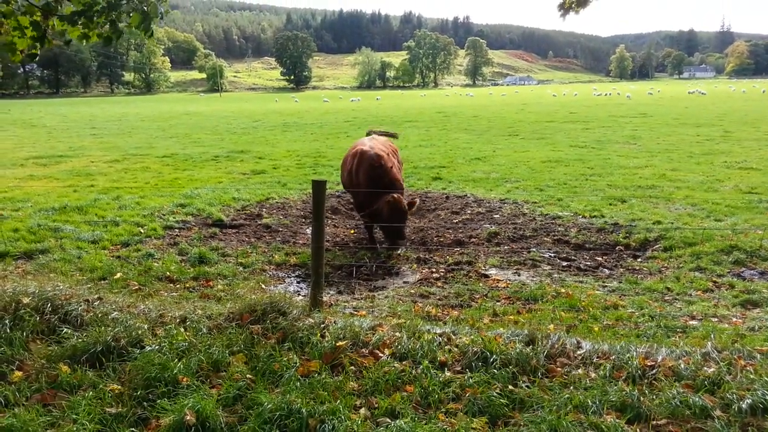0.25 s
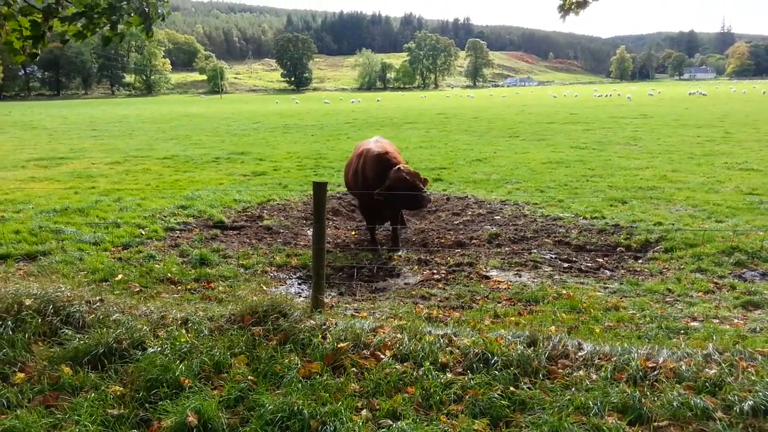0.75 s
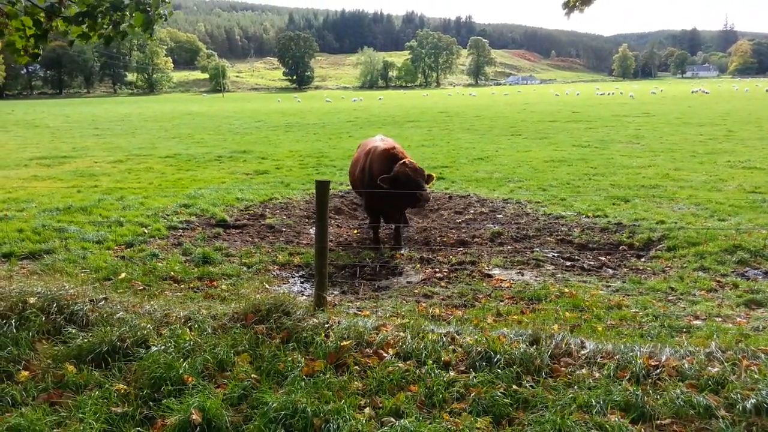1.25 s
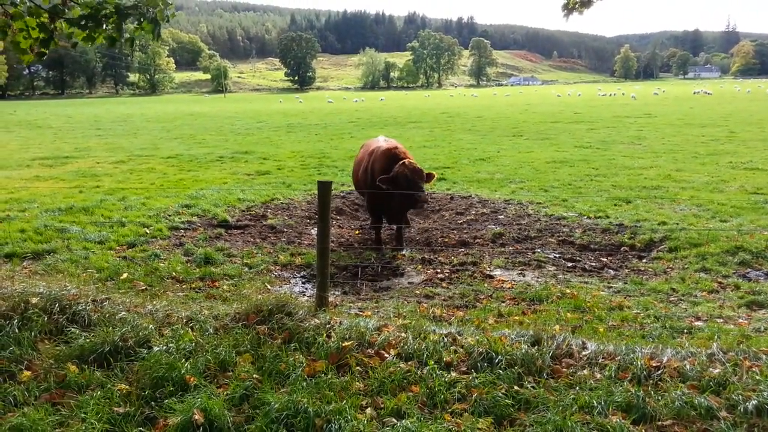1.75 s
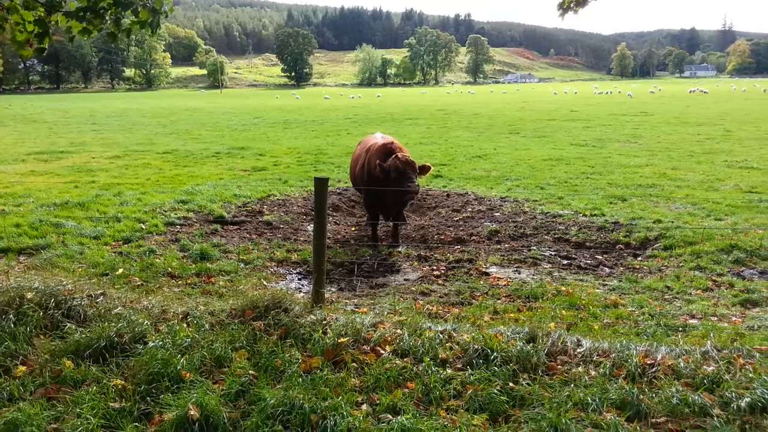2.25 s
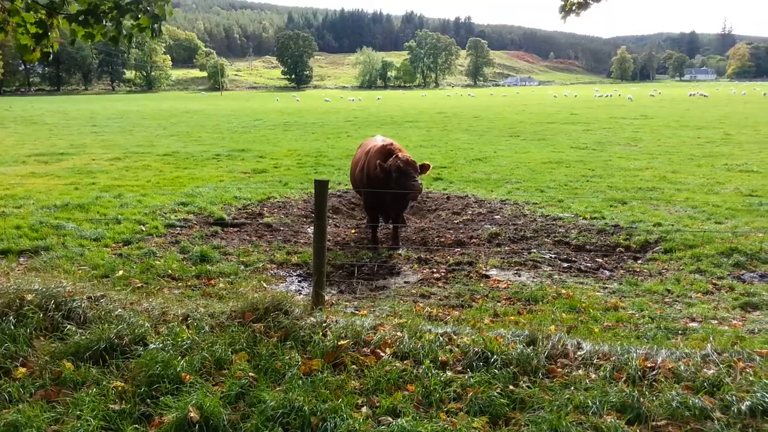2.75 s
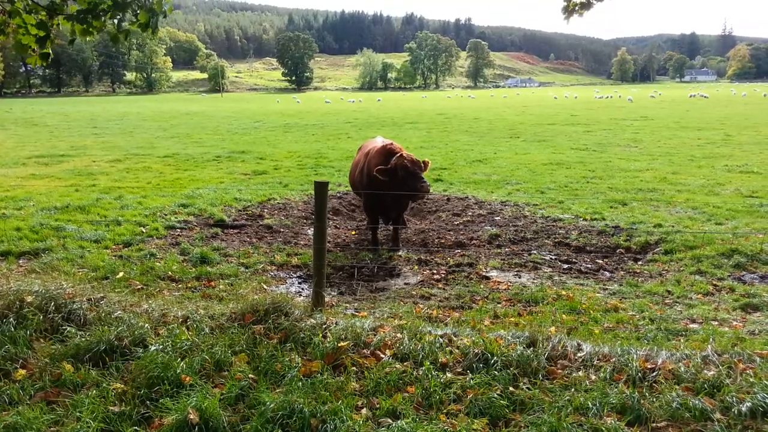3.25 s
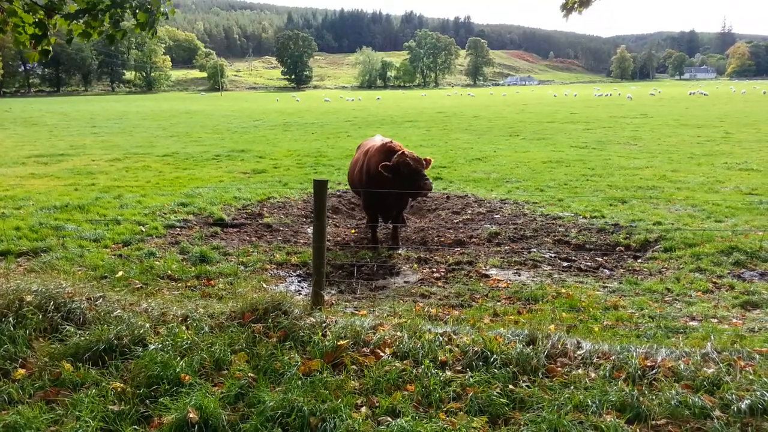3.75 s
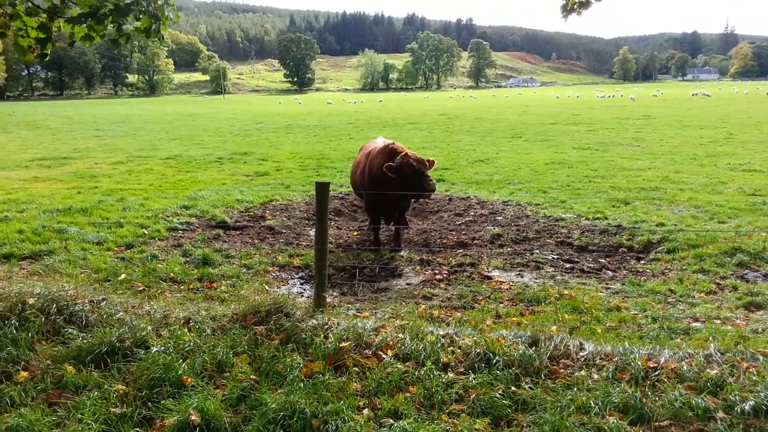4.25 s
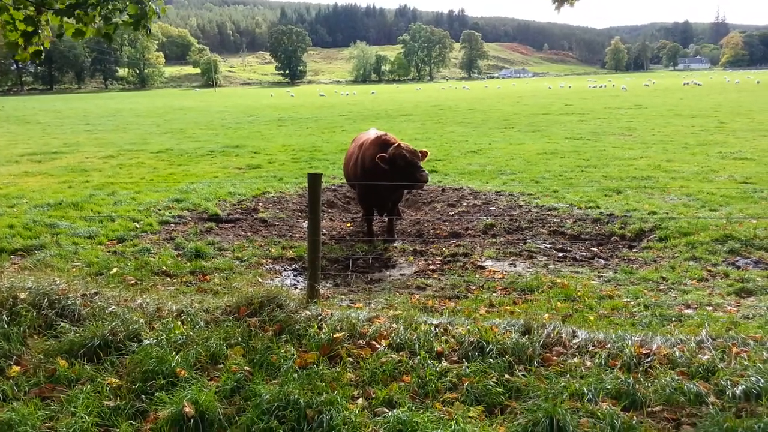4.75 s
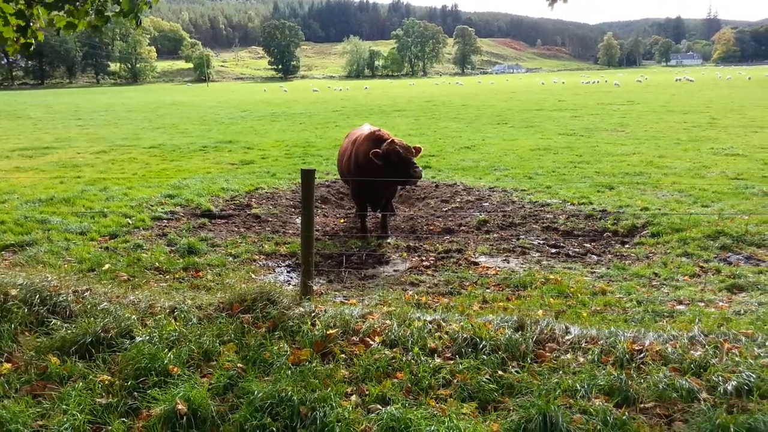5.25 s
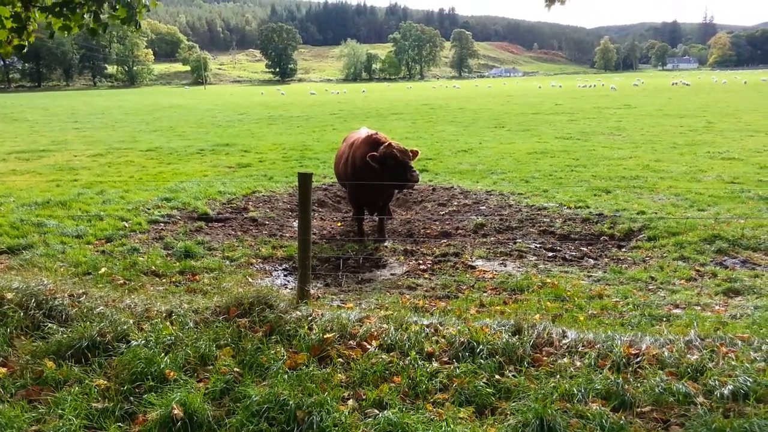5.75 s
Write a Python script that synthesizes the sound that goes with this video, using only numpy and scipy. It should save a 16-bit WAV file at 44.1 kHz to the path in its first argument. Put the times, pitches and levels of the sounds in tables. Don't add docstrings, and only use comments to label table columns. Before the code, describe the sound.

A bull ends a soft low, then gives two long, rumbling, hoarse bellows in an open pasture while gusty wind buffets the microphone.

```python
import sys
import numpy as np
from scipy import signal
from scipy.fft import rfft, irfft
from scipy.io import wavfile
from scipy.ndimage import uniform_filter1d

SR = 44100
rng = np.random.default_rng(int(sys.argv[2]) if len(sys.argv) > 2 else 0)


def gain_from_decibels(decibels):
    exponent = np.asarray(decibels, float) / 20
    return 10 ** exponent


def to_wav(s):
    ch = np.atleast_2d(s).T
    pcm = np.round(np.clip(ch, -1, 1) * 32767)
    wavfile.write(sys.argv[1], SR, pcm.astype(np.int16))


N = 265345

# frequency in Hz, width in Hz, level in dB.
NARROW_THROAT = [(475, 21.5, 1.5), (733, 64, 8.5), (854, 114, -4), (1020, 70, 5), (1185, 110, -16),
                 (1627, 150, -12.5), (1865, 120, -5.5), (1840, 170, -5)]
# frequency in Hz, width in Hz, level in dB.
WIDE_THROAT = [(516.5, 18, 1), (665, 51, 2), (774, 30, -2), (860, 20, -3), (958.5, 55, 0), (1163, 52, -5),
               (1475, 27, -8), (1723, 118, -11.5), (2073, 195, -20), (2440, 130, -29.5), (2893, 65, -22)]
# frequency in Hz, width in Hz, level in dB.
PUFF_THROAT = [(616, 122, -3), (740, 255, -2), (966, 166, -6.5), (1116, 100, -14), (1700, 270, -11.5),
               (1880, 130, -13.5), (2210, 420, -16.5)]
# order of the fold cycle, level in dB, below which order (3 or 4).
SIDE_ORDERS = [(2, -18, 3), (5, -14, 3), (6, -27, 3), (8, -35, 3), (9, -34, 3), (10, -23.5, 4),
               (11, -28, 3)]


def bellows():
    hz, fourth_db, pairing_db, throat_db, rough, mouth = bellow_controls()
    third_db = fourth_db + pairing_db
    cycle = np.cumsum(hz) / SR
    chest = chest_orders(cycle, third_db, fourth_db, rough, mouth)

    slip = .3 * rough ** 2.5 * drift(9)
    beats = 2 * (cycle + slip) + .12 * rough ** 2 * drift(60)
    count = np.floor(np.maximum.accumulate(beats))
    closing = np.diff(count, prepend=count[0]) > 0
    paired = np.clip((third_db - fourth_db + 14) / 22, 0, 1)
    weak = np.where(count % 2 == 1, 1 - .8 * paired, 1)
    pulses = rms_one(closing * weak * gain_from_decibels(6 * rough ** 1.5 * rng.standard_normal(N)))

    gate = .35 + np.exp(-3 * (beats % 1)) * weak
    breath = rms_one(gate * gain_from_decibels(1.9 * drift(37)) * rng.standard_normal(N))
    airy = np.clip(.2 + .8 * rough ** 1.6, 0, 1)
    source = np.sqrt(1 - airy ** 2) * pulses + airy * breath
    voiced_rush = .8 + 2.6 * (1 - airy) * (1 - paired) ** 2
    rush = np.where(mouth > 1, 1.9 - 1.1 * mouth, voiced_rush)
    source = source + rush * band(breath, 1350, 6000)

    throat = 0
    for shape, modes in enumerate((NARROW_THROAT, WIDE_THROAT, PUFF_THROAT)):
        share = np.clip(1 - np.abs(mouth - shape), 0, 1)
        throat = throat + np.sqrt(share) * rms_one(resonances(source, modes))
    return chest + gain_from_decibels(throat_db) * evened(throat)


def chest_orders(cycle, third_db, fourth_db, rough, mouth):
    seventh_db = fourth_db - 38.5 + 27 * np.sqrt(np.clip(mouth * (1 - rough), 0, 1))
    levels = {3: third_db, 4: fourth_db}
    orders = [(3, third_db), (4, fourth_db), (7, seventh_db)]
    orders += [(k, levels[of] + db) for k, db, of in SIDE_ORDERS]
    chest = 0
    for k, db in orders:
        unsteady = rough ** 1.5 * (.3 if k == 4 else .95)
        chance = (drift(16) + 1j * drift(16)) / np.sqrt(2)
        wander = np.sqrt(1 - unsteady ** 2) + unsteady * chance
        db = db - 14 * rough * (k > 8)
        turning = np.exp(2j * np.pi * (k * cycle + .03 * k * k))
        chest = chest + gain_from_decibels(db) * np.sqrt(2) * np.real(wander * turning)
    return chest


# time in seconds, slow fold cycle in Hz, effort in dB, pairing of beats in dB.
VOICE = [
    [(1.26, 49, -30, -4), (1.34, 55.44, -19, -10), (1.5, 54.35, -20, 0), (1.7, 55.43, -18, -8),
     (1.9, 53.86, -22.5, 3), (2.15, 54.4, -21.5, 5), (2.45, 55.2, -22.5, 5.5), (2.74, 53.35, -22.5, 2.5),
     (2.853, 51.02, -16.5, -18)],
    [(3.795, 47.63, -23.5, -39), (3.84, 53.27, -18.5, -45), (3.92, 54.68, -19, -6),
     (4.12, 55.87, -19, -13.5), (4.3, 55.5, -20, -2.5), (4.6, 53.57, -21.5, 0.5), (5.0, 56.37, -20.5, 3),
     (5.495, 52.31, -23.5, 5.5), (5.54, 51.4, -14, -8)],
]
# time in seconds, roughness 0 to 1, mouth from 0 narrow to 1 wide.
BEATING = [
    [(1.33, .15, 0), (1.37, .75, 0), (1.75, .65, .1), (1.9, .45, .3), (2.1, .3, .45), (2.65, .32, .6),
     (2.75, .6, .8), (2.86, .8, 1)],
    [(3.88, .12, 0), (3.92, .5, 0), (4.25, .5, .1), (4.4, .8, .3), (4.72, .7, .6), (4.8, .15, .9),
     (5.0, .11, 1), (5.3, .25, 1), (5.54, .6, 1)],
]
# start in seconds, hold in seconds, level in dB.
EXHALES = [
    (2.922, 0.048, -28),
    (5.576, 0.033, -28),
]


def bellow_controls():
    onset_db_per_s, stop_db_per_s = 900, 497
    throat_rise_s, throat_rise_db = 0.082, 13
    throat_fade_s, throat_fade_db = .06, 3.5
    puff_rise_db_per_s, puff_fall_db_per_s = 175, 252
    flick_hz, flick_s = 6, .035
    t = np.arange(N) / SR
    hz, effort_db, pairing_db = in_time(list(VOICE[0]) + list(VOICE[1]))
    silence_db, throat_db, shape = np.full(N, -90.), np.full(N, -90.), []
    for rows, beats, (puff_s, hold_s, puff_db) in zip(VOICE, BEATING, EXHALES):
        start, end = rows[0][0], rows[-1][0]
        edge_db = -onset_db_per_s * np.maximum(start - t, 0) - stop_db_per_s * np.maximum(t - end, 0)
        fill_db = -throat_rise_db * np.clip(1 - (t - start) / throat_rise_s, 0, 1)
        fill_db = fill_db - throat_fade_db * np.clip(1 - (end - t) / throat_fade_s, 0, 1)
        exhale_db = puff_db - puff_rise_db_per_s * np.maximum(puff_s - t, 0)
        exhale_db = exhale_db - puff_fall_db_per_s * np.maximum(t - puff_s - hold_s, 0)
        hz = hz + flick_hz * np.clip((t - end) / flick_s, 0, 1) * (t < end + .3)
        silence_db = np.maximum(silence_db, edge_db)
        throat_db = np.maximum(throat_db, np.maximum(-33.5 + edge_db + fill_db, exhale_db))
        shape += [(start - .1, .1, 0)] + list(beats)
        shape += [(beats[-1][0] + .035, 1, 2), (end + .3, 1, 2)]
    rough, mouth = in_time(shape)
    open_share = np.clip(1 - np.abs(mouth - 1), 0, 1)
    return hz, effort_db + silence_db, pairing_db, throat_db + 1.5 * open_share, rough, mouth


# time in seconds, pitch in Hz, level in dB.
LOW = [(0, 106.9, 2), (.08, 105.7, -1), (.14, 105, -0.5), (.2, 103.5, -5), (.26, 96.7, -4), (.3, 91.3, -5),
       (.33, 91, -40)]
# order, level in dB.
LOW_ORDERS = [(1, -32), (2, -28.5), (3, -47), (4, -45.5), (5, -50), (6, -45), (7, -43.5), (9, -51.5),
              (13, -56), (14, -67), (16, -67), (19, -56)]
# centre in seconds, half length in seconds, level in dB.
LOW_PUFF = (0.364, 0.063, -45)


def soft_low():
    hz, db = in_time(list(LOW) + [(.36, 90, -90)])
    cycle = np.cumsum(hz * (1 + 0.0066 * drift(40))) / SR
    tone = 0
    for k, level in LOW_ORDERS:
        order_db = level + db * (1.5 + 0.12 * k) + 3.3 * drift(42)
        tone = tone + gain_from_decibels(order_db) * np.sqrt(2) * np.sin(2 * np.pi * k * cycle + k * k)
    at, half, puff_db = LOW_PUFF
    swell = np.exp(-((np.arange(N) / SR - at) / half) ** 2)
    return tone + gain_from_decibels(puff_db) * swell * rms_one(resonances(rng.standard_normal(N), PUFF_THROAT[:3]))


# start in seconds, end in seconds, frequency in Hz, level in dB.
NOSTRILS = [
    (1.276, 1.5, 1944, -45),
    (2.052, 2.85, 5470, -53),
    (3.783, 4.301, 1895, -49),
    (4.354, 5.549, 2487, -49.5),
]


def nostrils():
    t, out = np.arange(N) / SR, 0
    for start, end, hz, db in NOSTRILS:
        swell = np.clip(np.minimum(t - start, end - t) / 0.082, 0, 1)
        out = out + gain_from_decibels(db) * swell * rms_one(resonances(rng.standard_normal(N), [(hz, 45, 0)]))
    return out


def ground_echo(x):
    return gain_from_decibels(-12) * band(np.roll(x, 310), 122, 3300, order=1)


def right_port(x):
    pole = np.exp(-2 * np.pi * 420 / SR)
    shaded = .5 * x + 0.92 * signal.lfilter([1 - pole], [1, -pole], x)
    return np.interp(np.arange(N) - 2.5, np.arange(N), shaded)


# time in seconds, peak in dB, treble share in dB, length in ms.
RIGHT_EDDIES = [(0.223, -15, -12, 10.4), (0.239, -14, -24, 8.1), (0.352, -14.5, -10, 3.55),
                (0.373, -10.5, -15, 7.7), (0.421, -10.5, -18, 1.6), (0.459, -14.5, -24, 3.3),
                (0.518, -15, -13, 2.8), (0.609, -13, -7.5, 12.7), (0.749, -18, -13.5, 8.2),
                (0.792, -15, -12, 5.6), (0.872, -13, -13, 4.6), (0.889, -10, -7, 3.1),
                (1.169, -18, -9, 4.9), (1.192, -14.5, -16.5, 23), (1.285, -11, -14.5, 37),
                (1.432, -13.5, -25, 4.3), (1.616, -14, -16, 9.1), (1.7, -9.5, -13.5, 3.15),
                (1.931, -9, -10.5, 12.9), (2.115, -11.5, -16.5, 8), (2.19, -18, -15, 9.1),
                (2.332, -17, -13, 5.7), (2.676, -16, -17, 7.1), (2.787, -15, -25, 4.8),
                (2.809, -8, -18.5, 5.2), (2.984, -18.5, -9, 6.04), (3.147, -20.5, -19, 7.3),
                (3.275, -19.5, -15, 20), (3.385, -15, -10, 4.1), (3.494, -13.5, -15, 6.2)]
# time in seconds, peak in dB,
# treble share in dB, length in ms.
MORE_RIGHT_EDDIES = [(3.245, -19.5, -12.5, 4.2), (3.297, -18.5, -15.5, 5), (3.355, -19, -24.5, 5.7),
                     (3.41, -20, -11, 8), (3.465, -23, -11, 15), (3.51, -17, -12.5, 5), (3.535, -20, -10.5, 25),
                     (3.575, -20.5, -18.5, 33), (3.665, -26.5, -24, 5.9), (4.4, -23, -16, 23),
                     (4.541, -16, -9, 12.7), (5.029, -14.5, -10, 6.4), (5.154, -18, -10, 5.5),
                     (5.287, -16, -20, 7.6), (5.721, -27.5, -12, 5.9), (5.765, -20.5, -22.5, 5),
                     (5.99, -20, -39, 12), (0.692, -22, -17, 3.5), (1.03, -21.5, -18, 14.6),
                     (1.971, -16, -12.5, 4), (2.376, -22, -14, 8.6), (2.842, -17.5, -17, 4.3)]


def exposed_wind():
    gust_db, swing_db = gust()
    table = list(RIGHT_EDDIES) + list(MORE_RIGHT_EDDIES)
    swell = wake(table)
    rumble = gain_from_decibels(gust_db + 7.5 + 1.5 * drift(4.9)) ** 2 + swell * gain_from_decibels(6.5) ** 2
    buffet = gain_from_decibels(-43.5 + 0.6 * swing_db - 4.5 * drift(12)) ** 2 + swell
    return buffeting(10 * np.log10(rumble), 10 * np.log10(buffet), lumpy_db=7.0) + eddies(table)


# time in seconds, peak in dB, treble share in dB, length in ms.
LEFT_EDDIES = [
    (3.069, -13, -18.5, 5.2),
    (3.102, -17, -27.5, 5.8),
    (3.133, -21, -28, 4.7),
    (3.484, -41, -27, 7),
    (3.531, -31, -35, 6.6),
]


def sheltered_wind():
    _, swing_db = gust()
    lee_db = -39 + 0.9 * swing_db + 5 * drift(5.4)
    return buffeting(lee_db + 1.0, lee_db - 16.5, lumpy_db=0) + eddies(LEFT_EDDIES)


# time in seconds, level in dB.
GUST = [(0, -32.5), (.12, -38), (.22, -24), (.31, -41.5), (.42, -32.5), (.7, -39.5), (1.0, -34.5),
        (1.12, -39.5), (1.45, -31), (2.0, -32.5), (2.4, -36), (2.95, -31), (3.2, -45), (3.5, -37),
        (3.8, -43), (4.5, -33), (5.5, -35.5), (5.88, -43.5)]


def gust():
    gust_db, = in_time(GUST)
    return gust_db, gust_db - gust_db.mean()


# frequency in Hz, density in dB per Hz.
RUMBLE = [(25, -37), (45, -12), (70, -1.5), (110, 2.5), (160, 0), (230, -12.5)]
# frequency in Hz, density in dB per Hz.
BUFFET = [(230, 6.5), (330, 3.5), (480, -6.5), (700, -22.5), (1000, -56), (1400, -47)]


def buffeting(rumble_db, buffet_db, lumpy_db):
    out, edges = 0, 22 * 2 ** np.arange(0, 6.4, .5)
    lumps = 1.76 * np.tanh(drift(31.0) / 1.62)
    white = rng.standard_normal((2, N))
    for k, (low, high) in enumerate(zip(edges, edges[1:])):
        hz = np.sqrt(low * high)
        gain = gain_from_decibels(rumble_db + at_hz(RUMBLE, hz) - 18.5) * (hz < 240)
        gain = gain + gain_from_decibels(buffet_db + at_hz(BUFFET, hz) - 22.0) * (hz > 160)
        depth_db = lumpy_db * np.clip(np.log2(hz / 40), 0, 4) / 4
        lumpy = gain_from_decibels(depth_db * (lumps + 0.43 * drift(7.6)))
        out = out + gain * lumpy * band(white[k % 2], low, high) * np.sqrt(SR / 2)
    return out


def eddies(table):
    out, size = np.zeros(N + 4000), 3000
    t = (np.arange(size) - 1400) / SR
    chance = rng.standard_normal((len(table), size))
    for (s, db, treble_db, ms), noise in zip(table, chance):
        top_hz = np.clip(760 * 2 ** ((treble_db + 5.0) / 14), 200, 1500)
        burst = noise * np.exp(-(t / (0.00056 * ms)) ** 2)
        swing = signal.sosfilt(signal.butter(4, top_hz, fs=SR, output="sos"), burst)
        swing = swing + 1.8 * band(swing, 90, 260, order=1)
        power = uniform_filter1d(band(swing, 297.4, 1500) ** 2, size=200)
        start = round(s * SR) - power.argmax() + 25
        peak = max(np.sqrt(power.max()), np.abs(swing).max() / 3)
        out[start:start + size] += gain_from_decibels(db) * swing / peak
    return out[:N]


def wake(table):
    t = np.arange(0, N, 32) / SR
    power = sum(gain_from_decibels(db - 22) ** 2 * np.exp(-((t - s) / .035) ** 2) for s, db, _, _ in table)
    return np.interp(np.arange(N) / SR, t, power)


# frequency in Hz, width in Hz, level in dB.
CAVITY = [(7240, 1120, 4.5), (10260, 4400, -17)]
# time in seconds, level in dB.
BREEZE = [(0, -38.5), (2.6, -38), (3.2, -42.5), (6, -40.5)]
# centre in seconds, half length in seconds, rise in dB.
FLURRIES = [
    (0.303, 0.08, 3),
    (4.113, 0.13, 5.5),
]


def cavity_hiss():
    t = np.arange(N) / SR
    hiss_db, = in_time(BREEZE)
    for s, half, db in FLURRIES:
        hiss_db = hiss_db + db * np.exp(-((t - s) / half) ** 2)
    return gain_from_decibels(hiss_db + 1.04 * drift(5.7)) * rms_one(resonances(rng.standard_normal(N), CAVITY))


# frequency in Hz, density in dB per Hz.
FIELD_LEFT = [(150, -66), (400, -76), (900, -83.5), (2000, -81.5), (3000, -85), (4500, -82), (6500, -87),
              (9000, -94.5), (12000, -99), (15000, -108)]
# frequency in Hz, density in dB per Hz.
FIELD_RIGHT = [(150, -90), (500, -109), (1200, -89), (2000, -79.5), (3200, -83), (4500, -82.5), (6500, -78),
               (12000, -87.5), (15000, -106)]


def field(spectrum):
    noise = rfft(rng.standard_normal(N))
    hz = np.maximum(np.arange(len(noise)) * SR / N, 1)
    steep = 1 / (1 + (120 / hz) ** 4)
    rustle = irfft(noise * gain_from_decibels(at_hz(spectrum, hz)) * steep, N) * np.sqrt(SR / 2)
    easing_db = np.interp(np.arange(N) / SR, [2.4, 3.2], [1.0, -1.0])
    return gain_from_decibels(.6 * drift(1.5) + easing_db) * rustle


def rms_one(x):
    return x / np.sqrt(np.mean(x ** 2) + 1e-20)


def evened(x):
    return x / np.sqrt(uniform_filter1d(x ** 2, size=2600) + 1e-9)


def in_time(rows):
    s, *columns = np.transpose(rows)
    return [np.interp(np.arange(N) / SR, s, c) for c in columns]


def at_hz(points, hz):
    table_hz, db = np.transpose(points)
    return np.interp(np.log(hz), np.log(table_hz), db)


def drift(rate):
    r = np.exp(-16 * np.pi * rate / SR)
    slow = signal.lfilter([1], [1, -2 * r, r * r], rng.standard_normal(N // 8 + 4002))[4000:]
    return np.interp(np.arange(N) / 8, np.arange(len(slow)), rms_one(slow))


def band(x, low_hz, high_hz, order=2):
    return signal.sosfilt(signal.butter(order, [low_hz, high_hz], "band", fs=SR, output="sos"), x)


def resonances(x, modes):
    out = 0
    for k, (hz, width, db) in enumerate(modes):
        r = np.exp(-np.pi * width * 1.5 / SR)
        section = [(1 - r * r) / 2, 0, (r * r - 1) / 2, 1, -2 * r * np.cos(2 * np.pi * hz / SR), r * r]
        out = out + (-1) ** k * gain_from_decibels(db) * signal.sosfilt([section, section], x)
    return out


def scene():
    bull = bellows() + soft_low() + nostrils()
    bull = bull + ground_echo(bull)
    left = sheltered_wind() + field(FIELD_LEFT)
    right = exposed_wind() + cavity_hiss() + field(FIELD_RIGHT)
    return np.array([bull + left, right_port(bull) + right])


def low_pass(x):
    return signal.sosfilt(signal.butter(12, 14500, fs=SR, output="sos"), x)


def record(dry):
    cut = signal.sosfilt(signal.butter(3, 40, "high", fs=SR, output="sos"), dry)
    top = signal.sosfiltfilt(signal.butter(4, 11500, "high", fs=SR, output="sos"), cut)
    dulled = np.clip(3.2 * np.sqrt(uniform_filter1d(cut[0] ** 2, size=4000)), 0, .55)
    mix = .98 * np.tanh((cut - dulled * top) / .98)
    return low_pass(mix)


dry = scene()
out = record(dry)
to_wav(out)
```